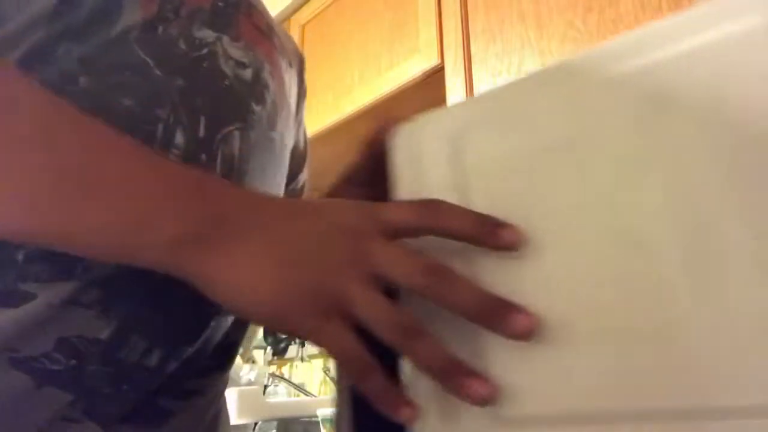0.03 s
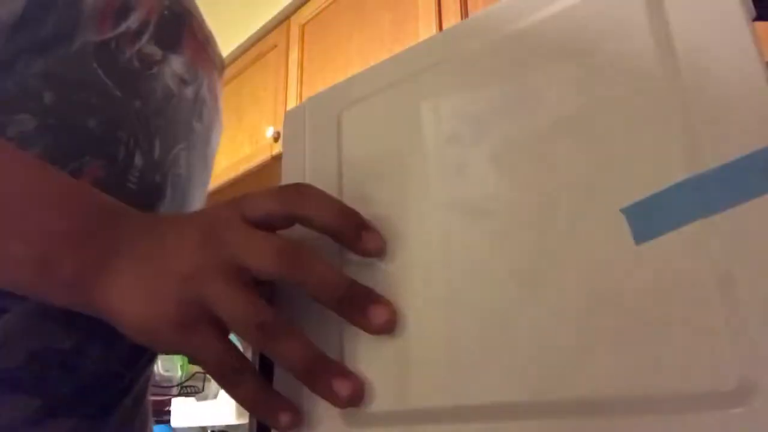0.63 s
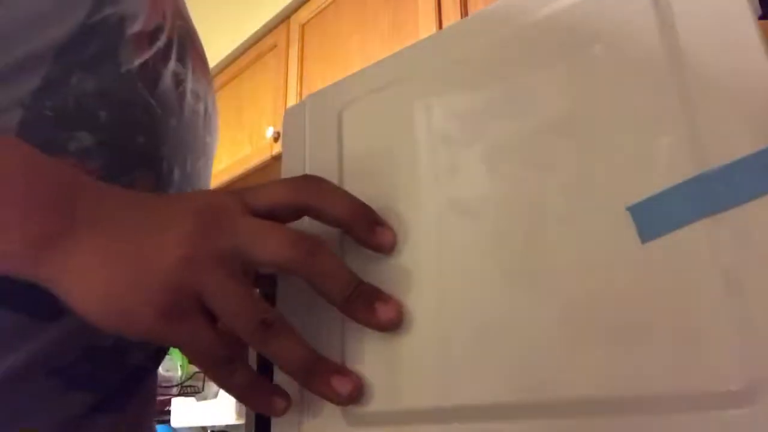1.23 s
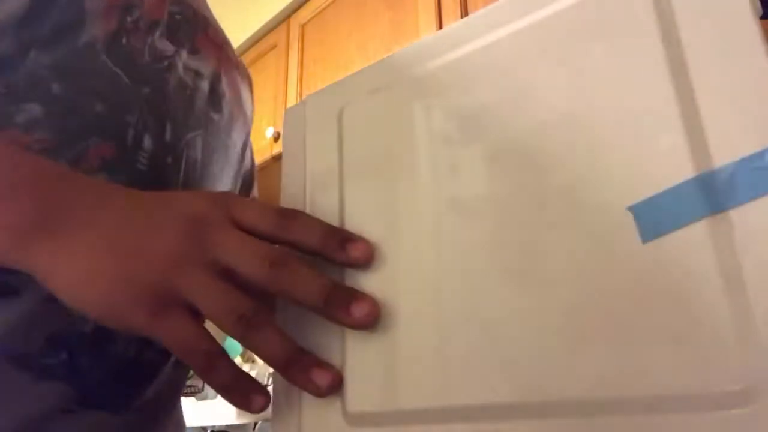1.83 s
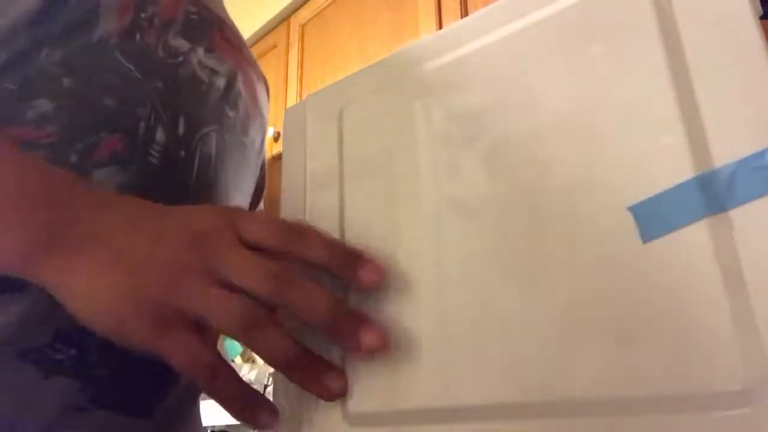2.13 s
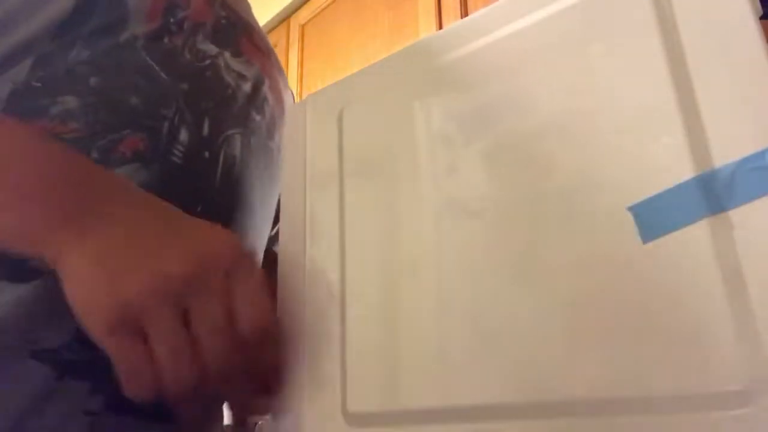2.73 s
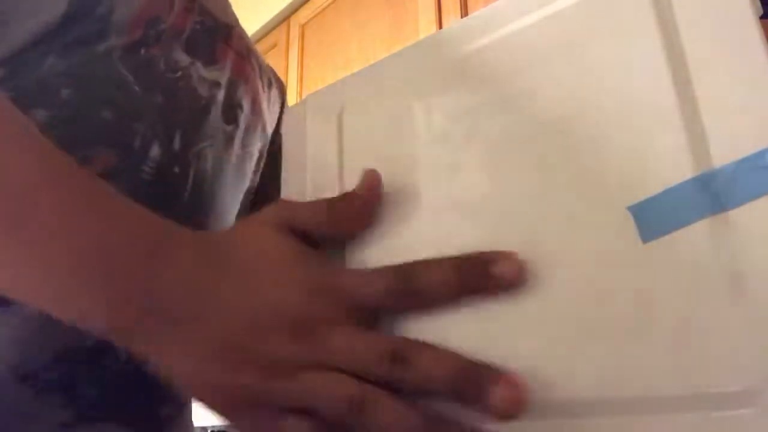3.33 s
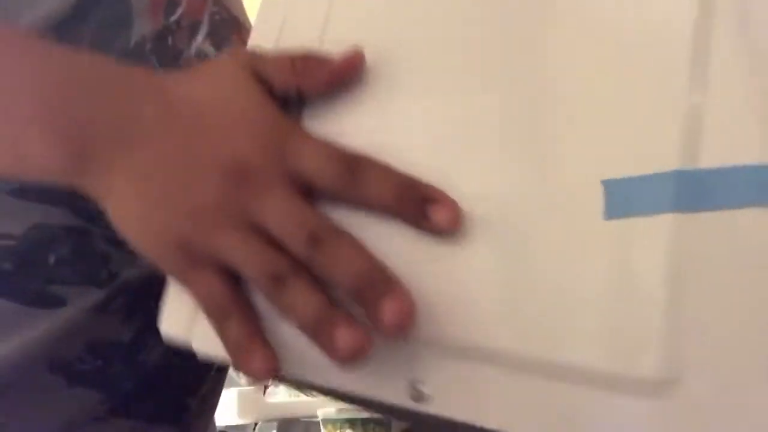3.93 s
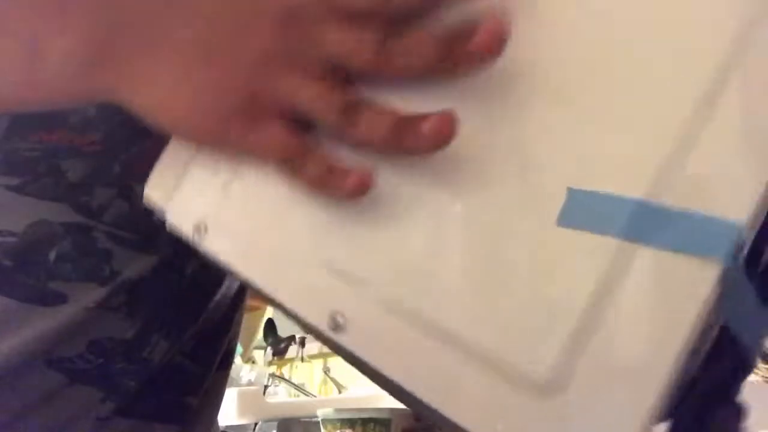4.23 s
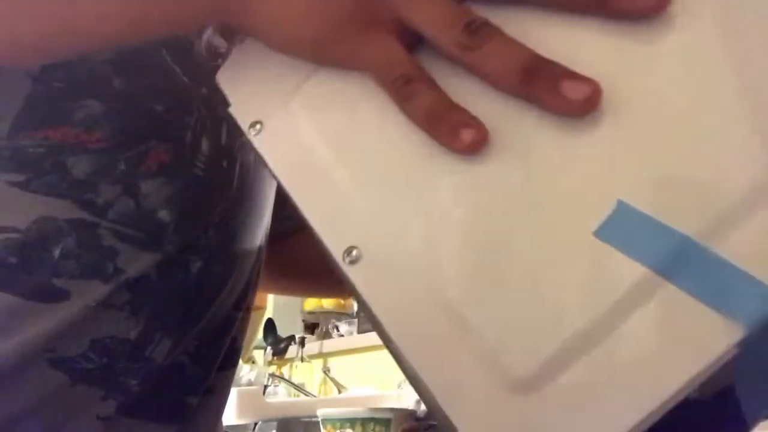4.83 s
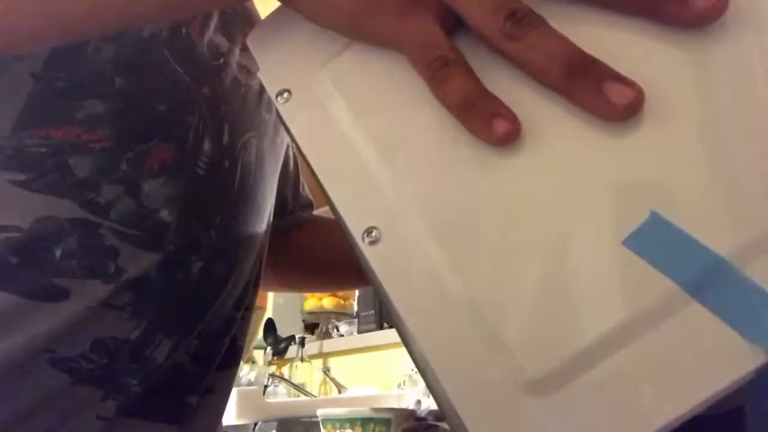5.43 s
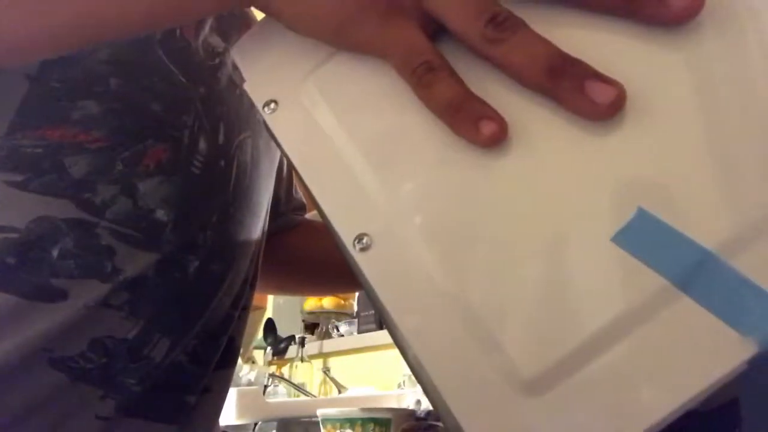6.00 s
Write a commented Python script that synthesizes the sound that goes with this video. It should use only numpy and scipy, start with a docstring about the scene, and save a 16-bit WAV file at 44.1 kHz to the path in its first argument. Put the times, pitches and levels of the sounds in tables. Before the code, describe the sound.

A small microwave oven is shifted and tilted on a kitchen counter, scraping, rattling and landing with hollow metal clunks.

```python
"""A small microwave oven is moved on a kitchen counter, close by, over a low room rumble.
First its feet scrape in stick-slip and a palm brushes the paint. Loose parts rattle; at 1.9 s it lands
and the steel case booms and clatters. Hand pats and light clicks follow. From 3.45 s it tips onto one
edge, lands and is dragged; a rubber foot creaks, it lands again near 4.4 s and loose parts shift.
A soft bump and a faint high whistle end it. The kitchen rings briefly after each blow."""
import sys
import numpy as np
from scipy import signal
from scipy.fft import rfft, irfft, next_fast_len
from scipy.io import wavfile
from scipy.ndimage import uniform_filter1d

SR = 44100
rng = np.random.default_rng(int(sys.argv[2]) if len(sys.argv) > 2 else 0)


def wrap_up_sound(samples):
    """Save the sound to the file named by the first command line argument, as 16-bit audio."""
    columns = np.atleast_2d(samples).T
    # keep every value between -1 and 1, then stretch to whole-number steps
    tamed = np.clip(columns, -1, 1)
    steps = np.round(tamed * 32767).astype(np.int16)
    wavfile.write(sys.argv[1], SR, steps)


N = 267378
CLOCK_S, RING_S = np.arange(N) / SR, np.arange(SR) / SR

# Spectra. Each row: frequency in Hz, relative level in dB.
RUMBLE_SPECTRUM = [(12, -63), (20, -29), (38, -3), (87, -5), (129, -8), (148, -10.5), (225, -6.5),
                   (282, -20), (324, -14.5), (686, -21), (958, -23), (1820, -34), (2090, -38.5),
                   (4190, -45), (15500, -61.5)]
HISS_SPECTRUM = [(500, -34), (2000, 4), (4000, 2.5), (6200, 0.5), (8000, -5), (10500, -10), (12800, -5.5),
                 (15500, -13.5)]
TICK_SPECTRUM = [(100, -41.5), (900, 2), (2500, -1.5), (6500, -8), (9000, -13), (15000, -18)]
CREAK_SPECTRUM = [(300, -30), (560, 6.5), (1120, 9), (1650, -23.5), (2200, -5), (4000, -44.5), (8000, -51)]
RASP_SPECTRA = [
    [(280, -34), (440, 12), (560, -6), (700, -3), (950, -8), (1350, -6.5), (2100, -12.5), (2700, -17),
     (4300, -18.5), (4950, -26.5), (6000, -16.5), (8200, -29.5), (15500, -37)],
    [(260, -25), (440, 1.5), (650, -10), (820, -6.5), (960, -1), (1300, -7), (1560, -5), (2100, -7.5),
     (2650, -13.5), (3200, -14), (3700, -17.5), (5800, -28), (8200, -33.5), (15500, -47)],
]  # two tables: flat, on edge
JUDDER_SPECTRUM = [(30, -12), (55, 4), (85, -6), (125, -1.5), (205, 4.5), (290, -1), (360, -1),
                   (450, -28.5), (600, -28), (1200, -85)]
CLATTER_SPECTRUM = [(30, -30.5), (80, 9.5), (180, -1), (350, 5), (700, 2), (1100, -1.5), (2000, -4),
                    (3500, -7.5), (6200, -11), (8500, -14.5), (15000, -14.5)]
# Decay by band. Each row: frequency in Hz, T60 in seconds.
KITCHEN_DECAY = [(80, 0.51), (300, 0.66), (1000, 0.47), (3000, 0.34), (7000, .3), (10000, 0.22),
                 (15000, 0.33)]
CLATTER_DECAY = [(100, 0.48), (400, 0.19), (1500, 0.146), (5000, 0.11), (15000, 0.16)]
# Modes of the steel case and of the bounce on the feet.
# Each row: frequency in Hz, relative level in dB, nominal T60 in seconds.
CASE_MODES = [(123.5, 1, 0.99), (150.5, 2.5, 0.55), (180, -12, 3.6), (217.5, -6.5, 0.34), (240.7, 2, 0.12),
              (265.25, -8.5, 2.6), (301.2, -1, 0.34), (335.4, -6.5, 0.88), (375.9, 0.5, 0.5), (405, 1, 0.4),
              (504, -10, 0.8), (665, -3.5, 0.81), (729, -30, 3.1), (875, -21, 0.69), (918, 3, 0.067),
              (938, -14.5, 0.22), (1060, -15, 0.69), (1200, -9, 0.22), (1355, 1, 0.099),
              (1640, -27.5, 0.67), (1810, -6.5, .3), (2045, -2, 0.16), (2040, -13.5, 0.14),
              (2306, -28, 0.13), (2475, -9.5, 0.14), (2840, -14, 0.059), (2902, -19, 0.42),
              (3630, -17, 0.47), (4580, -21.5, .25)]
FOOT_MODES = [(55.3, 10, 0.25), (74, -4.5, 0.09), (88, 10.5, 0.15), (109, 9, 0.079)]
# Resonances of the thin cover. Each row: frequency in Hz, lift in dB.
COVER_PEAKS = [(965, 4), (1115, 5.5), (1530, 3), (1940, 5), (2190, 6.5), (2692, 6.5), (3090, 4.5),
               (3400, 6.5), (3790, 5.5), (4350, 8), (4600, 3.5), (5167, -4), (5560, 2.5), (5727, 4.5),
               (6160, 11.5), (6680, 7), (7515, 6), (8010, 6)]
# Resonances that sing under dragging. Each row: frequency in Hz, width in Hz, lift in dB.
DRAG_PEAKS = [(451, 28, -9.5), (960, 21, 7.5), (1530, 27, 8.5), (2170, 45, 7), (2420, 38, 2), (2710, 45, 3),
              (3156, 44.5, 10), (5623, 68, 12)]
# Room hum. Each row: frequency in Hz, level in dB.
HUM_TONES = [(82, -55.5), (219, -65.5)]
# Faint whistle. Each row: time in seconds, frequency in Hz, level in dB.
WHISTLE_PATH = [(5.83, 4210, -79), (5.869, 4270, -71), (5.96, 4430, -73), (6.06, 4390, -82.5)]
# Tilt. Each row: time in seconds, share of the weight on one edge from 0 to 1.
EDGE_SHARE = [(3.45, 0.15), (3.7, 0.83)]
# Damping by the hands. Each row: time in seconds, extra decay in dB per second.
HAND_DAMPING = [(1.7, 44), (1.9, 25.5), (2.7, 1), (3.4, 42), (3.7, 112), (4.46, 161), (4.8, 54)]
# Palm strokes. Each row: start in seconds, length in seconds, level in dB.
PALM_BRUSHES = [(0.652, 0.56, -64), (2.843, 0.41, -69), (3.448, 0.42, -50.5), (3.85, .6, -61.5)]
# Clicks and fingertip squeaks. Each row: start in seconds, level in dB, ring in Hz, ring lift in dB,
# chatter in seconds.
LIGHT_TICKS = [ (1.046, -62, 2700, 4.5, 0.12), (1.151, -57, 1270, 16, 0.014),
               (1.429, -64.5, 2900, 4, .0055), (1.792, -46, 3815, 12, 0.01),
               (2.232, -57.5, 12400, 7, 0.038), (2.79, -40.5, 2648, 12.5, 0.017),
               (3.100, -57.5, 1830, 11.5, 0.062), (3.412, -59, 13000, 8, .02),
               (3.553, -51.5, 1800, 11, 0.013), (3.756, -47.5, 3460, 11.5, .0046),
               (4.299, -51.5, 12000, 3, 0.0036), (4.341, -55, 7000, 5.5, .0041),
               (4.487, -33.5, 4520, 15, 0.01), (4.502, -30, 2860, 13, 0.024),
               (4.575, -35, 2780, 14.5, 0.031), (4.995, -41.5, 13000, 7.5, .004),
               (5.003, -36, 5204, 4, 0.0022)]
# Foot creaks. Each row: start in seconds, level in dB, slip rate in Hz, length in seconds.
FOOT_CREAKS = [(4.27, -23.5, 557, 0.02), (4.306, -31.5, 650, 0.026), (4.341, -29.5, 410, 0.028),
               (4.363, -32, 590, 0.012)]
# Shoves. Each row: start in seconds, length in seconds, rasp in dB, judder in dB.
COUNTER_SHOVES = [ (-.45, 1.101, -35.5, -34), (3.422, 0.59, -43, -45), (3.709, 0.67, -36, -37),
                  (4.158, 0.35, -36.5, -35), (4.46, 0.46, -43, -34)]
# Soft bumps. Each row: start in seconds, clatter in dB, hardness in Hz, chatter in seconds, ring in Hz,
# boom in dB, boom centre in Hz.
SOFT_BUMPS = [ (1.013, -42.5, 3250, 0.0034, 650, -43.5, 202), (2.308, -37.5, 1670, 0.0024, 430, -41, 295),
              (2.346, -62, 997, 0.011, 403, -40.5, 138), (2.407, -57.5, 6030, 0.0048, 2950, -39, 151.7),
              (2.602, -38.5, 3860, 0.018, 860, -41.5, 301), (3.319, -50, 2100, .005, 401, -47, 304),
              (3.416, -35.5, 1500, 0.00243, 330, -29, 149), (3.428, -36, 4040, 0.0046, 352, -53, 303.3),
              (3.634, -44, 900, 0.0044, 378, -49.5, 288), (4.221, -41, 1700, 0.0088, 1000, -32, 200),
              (4.271, -30, 1600, .005, 1560, -45.5, 260), (4.303, -31, 1196, 0.0094, 710, -50, 258),
              (4.432, -32, 1010, 0.0098, 1023, -43, 253.2), (5.632, -50, 2080, 0.0057, 1690, -53.5, 262.5)]
# Loose parts. Each row: start in seconds, clatter in dB, hardness in Hz, chatter in seconds, boom in dB.
PART_RATTLES = [ (1.668, -21.5, 5260, 0.017, -34.5), (1.733, -24.5, 4550, 0.025, -41),
                (1.789, -28.5, 2620, 0.012, -29.5), (1.82, -37, 2800, 0.013, -30.5),
                (1.869, -32, 4020, 0.011, -38), (1.899, -33, 4000, .009, -42),
                (3.390, -41, 2703, 0.016, -33), (4.485, -18.5, 6300, 0.0037, -27),
                (4.504, -28.5, 3500, 0.065, -18.5), (4.565, -24, 4260, 0.018, -17.5),
                (4.610, -28, 3370, 0.0146, -44), (4.655, -22, 3560, 0.0278, -27),
                (4.680, -29, 3980, 0.0042, -34), (4.716, -32, 3240, 0.027, -31.5),
                (4.907, -37, 1952, 0.036, -36)]
# Landings. Each row: start in seconds, clatter in dB, hardness in Hz, chatter in seconds, ring in Hz,
# ring lift in dB, thud in dB, boom in dB, boom centre in Hz, gap to the second foot in seconds,
# its boom in dB, its boom centre in Hz.
FOOT_LANDINGS = [ (1.9084, -10.5, 6530, 0.0051, 800, 3.5, -29, -22.5, 146, .0105, -24, 302.4),
                 (3.6994, -19.5, 1940, 0.00053, 1870, 11, -19.5, -27, 311, 0.024, -26, 305.5),
                 (4.373, -31, 1100, .0034, 624, 10.5, -45.5, -25, 221, .023, -37, 252),
                 (4.4433, -16.5, 5200, 0.009, 1070, 17.5, -20.5, -15, 249, .0135, -15, 112)]


def amp(db):
    """dB to amplitude."""
    return 10 ** (np.asarray(db) / 20)


def unit_rms(x):
    """Scales to rms 1."""
    return x / np.sqrt(np.mean(x ** 2) + 1e-20)


def unit_attack(x):
    """Scales to rms 1 over the first 50 ms."""
    return x / np.sqrt(np.mean(x[:SR // 20] ** 2) + 1e-20)


def lookup(table, hz):
    """Interpolates over log frequency."""
    table_hz, value = np.transpose(table)
    return np.interp(np.log(hz + 1), np.log(table_hz + 1), value)


def bell(hz, centre_hz, octaves):
    """Resonance hump of height 1."""
    return 1 / (1 + (np.log2((hz + 1) / centre_hz) / octaves) ** 2)


def add(mix, start_s, sound):
    """Mixes in place."""
    part = mix[max(round(start_s * SR), 0):][:len(sound)]
    part += sound[:len(part)]


def filtered(x, gain):
    """Applies gain(hz); output rms 1."""
    size = next_fast_len(len(x))
    return unit_rms(irfft(rfft(x, size) * gain(np.fft.rfftfreq(size, 1 / SR)), size)[:len(x)])


def noise(count, spectrum):
    """Shaped noise, rms 1."""
    return filtered(rng.standard_normal(count), lambda hz: amp(lookup(spectrum, hz)))


def wobble(count, rate_hz):
    """Smooth random drift, rms 1."""
    return filtered(rng.standard_normal(count), lambda hz: np.exp(-(hz / rate_hz) ** 2))


def noise_tail(decay_table, hold_s=0):
    """Noise that holds, then decays band by band."""
    hz, t, bands = signal.stft(rng.standard_normal(SR), SR, nperseg=256, noverlap=192)
    bands = bands * amp(-60 * np.maximum(t - hold_s, 0) / lookup(decay_table, hz)[:, None])
    return signal.istft(bands, SR, nperseg=256, noverlap=192)[1][:SR]


def rise(tau_s):
    """Exponential onset."""
    return 1 - np.exp(-RING_S / tau_s)


def stroke_speed(length_s):
    """Half sine, rest to rest."""
    return abs(np.sin(np.pi * np.arange(0, length_s, 1 / SR) / length_s))


def by_tilt(time_s, flat, on_edge):
    """Blends two values by the weight on one edge."""
    return flat + np.interp(time_s, *np.transpose(EDGE_SHARE)) * (on_edge - flat)


def background():
    """Room rumble and wavering hum."""
    rumble = amp(-46.5) * noise(N, RUMBLE_SPECTRUM)
    hum = sum(amp(db) * unit_rms(np.sin(2 * np.pi * hz * CLOCK_S + 0.4 * wobble(N, 12)))
              for hz, db in HUM_TONES)
    return rumble + hum


def hiss(count):
    """Soft, slightly uneven hiss."""
    return noise(count, HISS_SPECTRUM) * amp(0.42 * wobble(count, 40))


def gated_hiss(x, threshold_db=-39, hold_s=0.393, open_db=-63.5, shut_db=-73):
    """Microphone hiss: loud treble opens a gate, which holds, then shuts abruptly."""
    treble = signal.sosfilt(signal.butter(4, 4000, "high", fs=SR, output="sos"), x)
    loud = uniform_filter1d(treble ** 2, size=256) > amp(threshold_db) ** 2
    since_loud_s = CLOCK_S - np.maximum.accumulate(np.where(loud, CLOCK_S, -np.inf))
    opened = uniform_filter1d(1.0 * (since_loud_s < hold_s), size=400)
    return hiss(N) * amp(shut_db + opened * (open_db - shut_db))


def kitchen(x):
    """Diffuse echo from counter, cupboards and walls."""
    tail = noise_tail(KITCHEN_DECAY) * (1 - np.exp(-(RING_S / 0.0076) ** 2))
    return signal.fftconvolve(x, tail / np.linalg.norm(tail))[:N]


def whistle():
    """Thin, faint, wavering tone."""
    time_s, hz, db = np.transpose(WHISTLE_PATH)
    cycles = np.cumsum(np.interp(CLOCK_S, time_s, hz) + 60 * wobble(N, 84)) / SR
    return amp(np.interp(CLOCK_S, time_s, db)) * (CLOCK_S > time_s[0]) * np.sin(2 * np.pi * cycles)


def brush(length_s, db):
    """A palm rubs the paint; hiss follows speed."""
    speed = stroke_speed(length_s)
    return amp(db) * speed ** 0.99 * hiss(len(speed))


def contact(gain, decay_table, chatter_s, grain_db, crack):
    """Surfaces chatter in tiny cracks, then dense modes ring out."""
    dense_modes = noise_tail(decay_table, hold_s=chatter_s)
    touching = np.exp(-(RING_S / (chatter_s + 0.0014)) ** 2)
    grains = amp(grain_db * wobble(SR, 520) * touching) * (1 + crack * touching)
    excitation = dense_modes * grains * rise(0.26 * chatter_s)
    # Minimum phase: no ringing ahead of a crack.
    log_gain = np.log(gain(abs(np.fft.fftfreq(8192, 1 / SR))) + 1e-5)
    body = np.fft.ifft(np.exp(np.conj(signal.hilbert(log_gain)))).real
    return unit_attack(signal.fftconvolve(excitation, body[:len(body) // 2])[:SR])


def tick(db, ring_hz, lift_db, chatter_s):
    """A light snap or squeak without boom or thud: one sharp resonance with wide skirts."""
    def gain(hz):
        peak = 1.4 * bell(hz, ring_hz, octaves=0.3) + 0.42 * bell(hz, ring_hz, octaves=0.06)
        return amp(lookup(TICK_SPECTRUM, hz) + lift_db * peak)
    return amp(db) * contact(gain, [(1000, 0.15), (12000, 0.075)], chatter_s, grain_db=3.5, crack=1.5)


def creak(db, slip_hz, length_s):
    """A rubber foot slips almost regularly, giving harmonics."""
    t = RING_S[:round(length_s * SR)]
    cycles = np.cumsum(slip_hz * (1 + 0.027 * wobble(len(t), 76))) / SR
    slips = sum(amp(lookup(CREAK_SPECTRUM, k * slip_hz)) * np.sin(2 * np.pi * k * cycles)
                for k in range(1, 12))
    envelope = signal.windows.tukey(len(t), 0.35) * np.exp(-0.5 * t / length_s)
    return amp(db) * unit_rms(slips) * envelope


def drag_gain(hz):
    """Narrow resonances of the dragged case."""
    modes_db = 5.6 * sum(bell(hz, mode_hz, octaves=0.00533) for mode_hz, _, _ in CASE_MODES)
    singing_db = sum(db / (1 + (2 * (hz - peak_hz) / width_hz) ** 2)
                     for peak_hz, width_hz, db in DRAG_PEAKS)
    return amp(modes_db + singing_db)


def slide(start_s, length_s, rasp_db, judder_db, slips_per_s=2200):
    """Stick-slip under the feet excites the case; the panels judder along."""
    speed = stroke_speed(length_s)[max(round(-start_s * SR), 0):]
    count, middle_s = len(speed), start_s + length_s / 2
    def rasp_gain(hz):
        flat_db, edge_db = (lookup(spectrum, hz) for spectrum in RASP_SPECTRA)
        return amp(by_tilt(middle_s, flat_db, edge_db)) * drag_gain(hz)
    slips = rng.standard_normal(count) * (rng.random(count) < slips_per_s / SR)
    rasp = filtered(slips + 0.48 * rng.standard_normal(count), rasp_gain)
    rasp += amp(by_tilt(middle_s, -12.5, -23)) * hiss(count)
    judder = filtered(rng.standard_normal(count),
                      lambda hz: amp(lookup(JUDDER_SPECTRUM, hz)) * drag_gain(hz))
    flutter = amp(1.3 * wobble(count, 32.3))
    return flutter * (amp(rasp_db) * rasp * speed ** 1.95 + amp(judder_db) * judder * speed ** 1.86)


def cover_gain(hz):
    """Narrow, bright resonances of the thin cover."""
    return amp(sum(db / (1 + ((hz - peak_hz) / (16 + 0.0047 * peak_hz)) ** 2)
                   for peak_hz, db in COVER_PEAKS))


def ring(modes, weight, damping_db_per_s, t60_scale=0.93):
    """Struck modes: slightly detuned sines with added damping."""
    hz, db, t60_s = np.transpose(modes)[:, :, None]
    detune = 1 + 0.0038 * rng.standard_normal(hz.shape)
    decay_db_per_s = 60 / (t60_s * t60_scale) + damping_db_per_s
    envelopes = weight(hz) * amp(db - decay_db_per_s * RING_S)
    return (envelopes * np.sin(2 * np.pi * hz * detune * RING_S)).sum(0)


def knock(start_s, db, hard_hz, chatter_s, ring_hz, lift_db, thud_db, boom_db, boom_hz, metal_db):
    """One blow: clatter and steel ring, brighter if harder; panel boom; foot thud. Hands damp modes."""
    grip_db_per_s = np.interp(start_s, *np.transpose(HAND_DAMPING))
    mid_dip_db = by_tilt(start_s, -0.5, 3.5)
    build_s = 0.25 * chatter_s
    def force(hz):
        colour_db = lift_db * bell(hz, ring_hz, octaves=0.3) - mid_dip_db * bell(hz, 700, octaves=0.12)
        return amp(colour_db) * (0.0068 + 1 / np.sqrt(1 + (hz / hard_hz) ** 4))
    clatter = contact(lambda hz: amp(lookup(CLATTER_SPECTRUM, hz)) * force(hz) * cover_gain(hz),
                      CLATTER_DECAY, chatter_s, grain_db=0.5, crack=0.37)
    metal = ring(CASE_MODES, lambda hz: force(hz) * hz / (hz + 600), grip_db_per_s + 10)
    boom = ring(CASE_MODES, lambda hz: bell(hz, boom_hz, octaves=0.3), grip_db_per_s)
    first_swing = 1 + 1.5 * np.exp(-RING_S / 0.033)
    thud = ring(FOOT_MODES, np.ones_like, 0.2 * grip_db_per_s)
    return (amp(db - 1.5) * clatter
            + amp(db + metal_db) * unit_attack(metal * rise(0.004 + build_s))
            + amp(boom_db) * unit_attack(boom * rise(0.0045 + build_s) * first_swing)
            + amp(thud_db) * unit_attack(thud * rise(0.017)))


def bumps():
    """Hands and feet bump the case softly; the nearest panel booms."""
    mix = np.zeros(N)
    for start_s, db, hard_hz, chatter_s, ring_hz, boom_db, boom_hz in SOFT_BUMPS:
        add(mix, start_s, knock(start_s, db, hard_hz, chatter_s, ring_hz, lift_db=8.5,
                                thud_db=boom_db - 8, boom_db=boom_db, boom_hz=boom_hz, metal_db=-16))
    return mix


def rattles():
    """Loose parts chatter on the case; tilt moves the boom to a higher-pitched panel."""
    mix = np.zeros(N)
    for start_s, db, hard_hz, chatter_s, boom_db in PART_RATTLES:
        add(mix, start_s, knock(start_s, db, hard_hz, chatter_s, ring_hz=1070,
                                lift_db=by_tilt(start_s, 4.5, 9.5), thud_db=db - 14.5,
                                boom_db=boom_db, boom_hz=by_tilt(start_s, 165.4, 283), metal_db=-13))
    return mix


def landings(metal_db=-15.5):
    """The oven lands on one foot, then on the next with weaker, duller clatter and its own boom."""
    mix = np.zeros(N)
    for start_s, *first_foot, gap_s, second_db, second_hz in FOOT_LANDINGS:
        add(mix, start_s, knock(start_s, *first_foot, metal_db))
        db, hard_hz, _, ring_hz, lift_db, thud_db, _, _ = first_foot
        second = knock(start_s, db - 8.5, 0.61 * hard_hz, chatter_s=0.007, ring_hz=ring_hz,
                       lift_db=lift_db / 2, thud_db=thud_db - 4.5,
                       boom_db=second_db, boom_hz=second_hz, metal_db=metal_db)
        add(mix, start_s + gap_s, second)
    return mix


def scene():
    """Oven in the kitchen, mono; the clicks are drier."""
    oven = landings() + rattles() + bumps()
    clicks = np.zeros(N)
    for start_s, *settings in LIGHT_TICKS:
        add(clicks, start_s, tick(*settings))
    for start_s, *settings in FOOT_CREAKS:
        add(oven, start_s, creak(*settings))
    for start_s, *settings in COUNTER_SHOVES:
        add(oven, start_s, slide(start_s, *settings))
    for start_s, *settings in PALM_BRUSHES:
        add(oven, start_s, brush(*settings))
    echo = kitchen(amp(-14.5) * oven + amp(-17) * clicks)
    return (oven + clicks + echo + background() + whistle())[None]


def record(dry, low_cut_hz=42, top_hz=15950):
    """Microphone: gated hiss, bass cut, soft overload, band limit."""
    highpass = signal.butter(4, low_cut_hz, "high", fs=SR, output="sos")
    thinned = signal.sosfilt(highpass, dry + gated_hiss(dry[0]))
    clipped = thinned / (1 + thinned ** 8) ** (1 / 8)
    lowpass = signal.firwin(511, top_hz, window=("kaiser", 9), fs=SR)
    return signal.oaconvolve(clipped, lowpass[None], "same")


dry = scene()
out = record(dry)
wrap_up_sound(out)
```